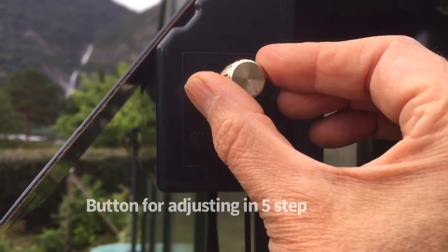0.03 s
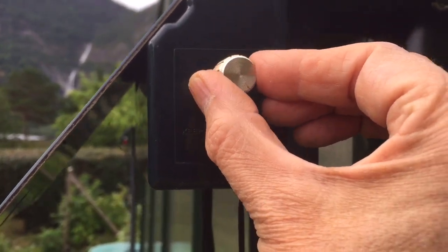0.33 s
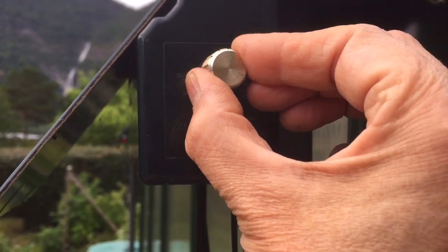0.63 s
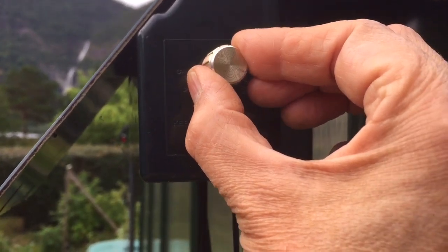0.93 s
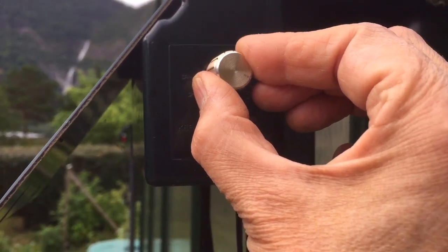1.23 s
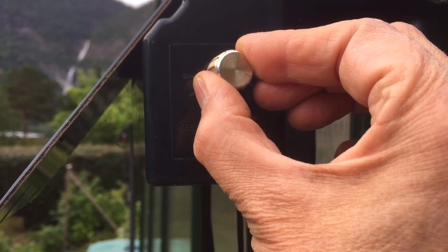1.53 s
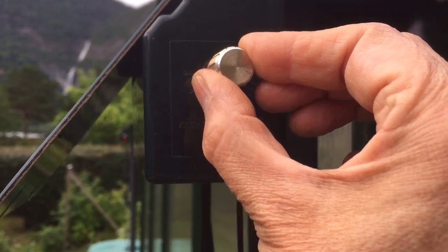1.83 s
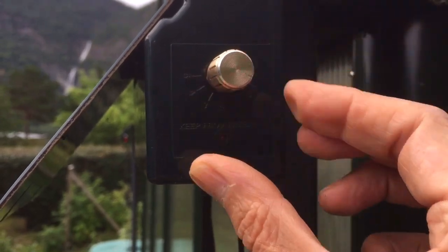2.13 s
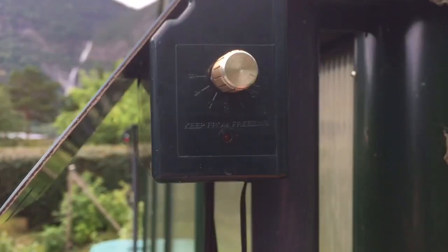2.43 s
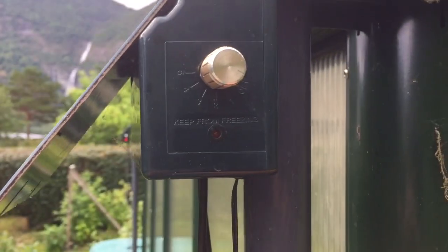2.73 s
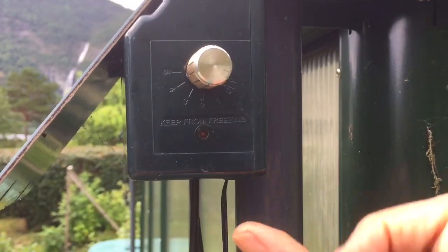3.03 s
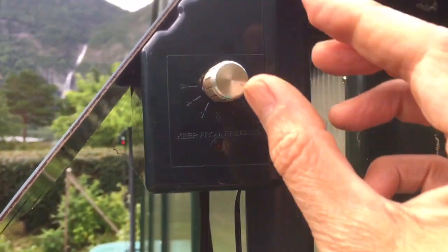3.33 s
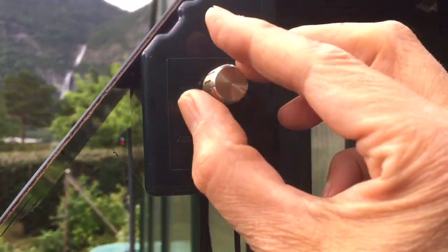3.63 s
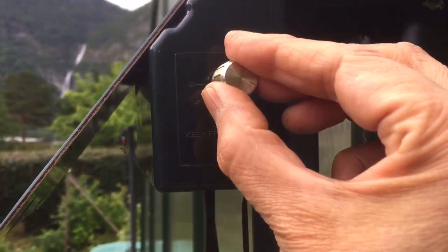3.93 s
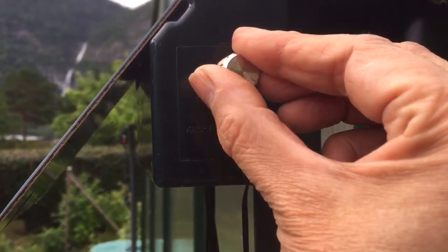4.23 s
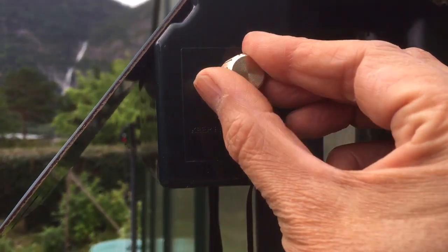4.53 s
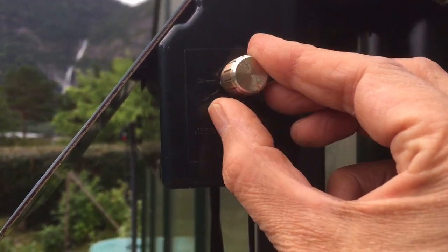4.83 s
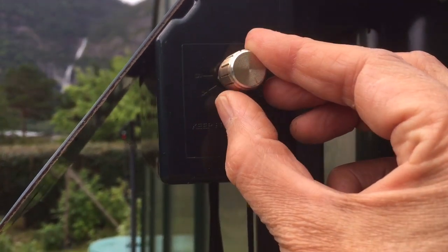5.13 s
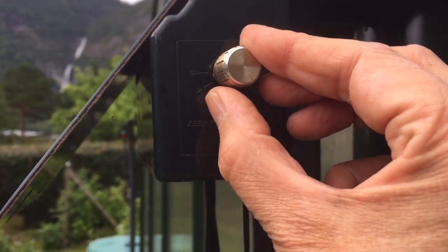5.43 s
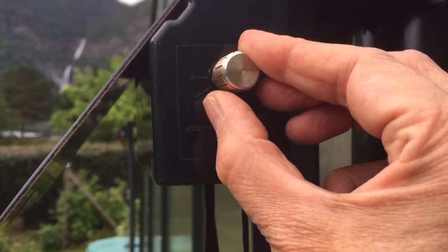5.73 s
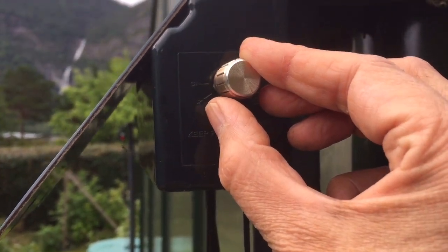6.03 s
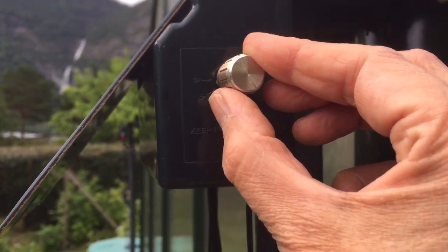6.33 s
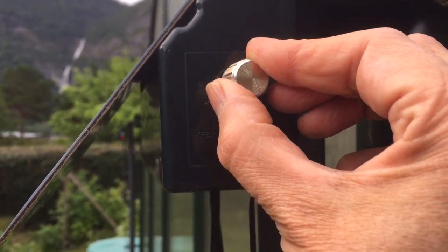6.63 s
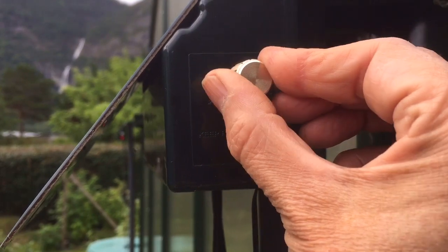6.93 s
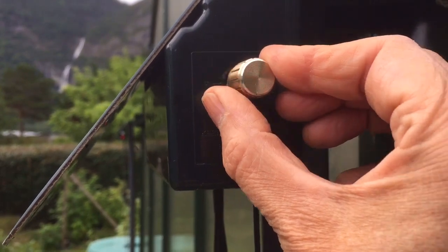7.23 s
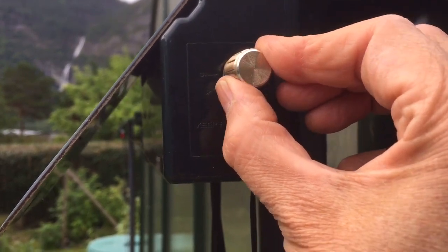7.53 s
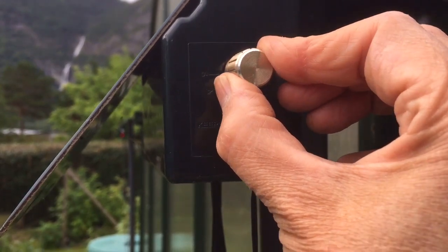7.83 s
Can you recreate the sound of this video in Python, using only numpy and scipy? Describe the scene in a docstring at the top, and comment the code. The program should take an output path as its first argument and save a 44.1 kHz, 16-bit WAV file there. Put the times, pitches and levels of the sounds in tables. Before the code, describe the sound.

Loud rattling buzz of a small water pump cuts out and starts again as a knob clicks, over a quieter motor hum.

```python
"""Beside a greenhouse, a small irrigation pump buzzes, is throttled, stops and later restarts.
Its piston knocks twice a turn and rings the pump body while water hisses through the valves.
Close by, a hand turns the stepped control knob and its detents snap. Behind it a second small
motor hums on, a bird calls far off, a faint high chirring swells and fades in the garden air,
and light wind nudges the microphone."""
import sys
import numpy as np
from scipy import signal
from scipy.fft import rfft, irfft, next_fast_len
from scipy.io import wavfile
from scipy.ndimage import uniform_filter1d

SR = 44100
rng = np.random.default_rng(int(sys.argv[2]) if len(sys.argv) > 2 else 0)


def to_wav(s):
    """Save 16-bit WAV."""
    ch = np.atleast_2d(s).T  # columns
    pcm = np.round(np.clip(ch, -1, 1) * 32767)  # PCM
    wavfile.write(sys.argv[1], SR, pcm.astype(np.int16))


N = 351918
TIME = np.arange(N) / SR
SIZE = next_fast_len(N + SR // 4, True)
FREQ = np.maximum(np.arange(SIZE // 2 + 1) * SR / SIZE, 1)

# parts that clack when the pressure stroke lands hard: pitch_hz, width_hz
CLACK_MODES = [(2350, 410), (4650, 220), (6900, 100)]
CHAMBER_HZ, CHAMBER_WIDTH_HZ = 1018, 120  # ring of the water chamber
STRAIN_HZ = 0.88  # lost speed at which the strain starts to level off


def undb(db):
    """Decibels to gain."""
    return 10 ** (np.asarray(db) / 20)


def shape(x, response):
    """Pass a sound through a frequency response."""
    return irfft(rfft(x, SIZE) * response, SIZE)[:N]


def noise(points):
    """Noise of rms 1, coloured by (freq_hz, level_db) points."""
    hz, db = np.transpose(points)
    coloured = shape(rng.standard_normal(N), undb(np.interp(np.log(FREQ), np.log(hz), db)))
    return coloured / np.sqrt(np.mean(coloured ** 2))


def walk(rate_hz):
    """Smooth random drift with a spread near 1."""
    hold = int(SR / rate_hz)
    steps = np.repeat(rng.standard_normal(N // hold + 1), hold)
    return 1.3 * uniform_filter1d(uniform_filter1d(steps, hold), hold)[:N]


def bell(hz, width_hz):
    """Gain of one resonance, halved at width_hz either side."""
    return 1 / (1 + ((FREQ - hz) / width_hz) ** 2)


def resonator(modes, travel_ms):
    """Response of a ringing body; bending waves take travel_ms at 1 kHz and bring the treble first."""
    power = sum((undb(db) * bell(hz, width)) ** 2 for hz, width, db in modes)
    cepstrum = irfft(np.log(power), SIZE)
    cepstrum[0] /= 2
    cepstrum[SIZE // 2:] = 0  # the ring follows the blow
    return np.exp(rfft(cepstrum) - 4j * np.pi * travel_ms * np.sqrt(FREQ / 1000))


def impulses(times, sizes):
    """Sharp blows placed between the samples."""
    out = np.zeros(N)
    at = np.asarray(times)[:, None] * SR
    index = at.astype(int) + np.arange(-5, 7)
    taps = np.sinc(index - at) * np.sinc((index - at) / 6)
    np.add.at(out, np.clip(index, 0, N - 1), taps * np.asarray(sizes)[:, None])
    return out


def scrape(times, sizes, decay_s):
    """A dying burst of noise at each blow, with the energy of that blow."""
    index = np.clip(np.asarray(times) * SR, 0, N - 1).astype(int)
    energy = np.bincount(index, np.asarray(sizes) ** 2, N)
    keep = np.exp(-2 / (decay_s * SR))
    return np.sqrt(signal.lfilter([1 - keep], [1, -keep], energy + 1e-18)) * rng.standard_normal(N)


def knocks(times, sizes, jitter_ms, scatter_db, grit_db, grit_hz, grit_s):
    """Slightly uneven blows; each rubs a little, so its treble is never quite the same twice."""
    chance = rng.standard_normal((len(times), 2))
    times = times + chance[:, 0] * jitter_ms / 1000
    sizes = sizes * undb(scatter_db * chance[:, 1])
    rough = undb(grit_db) + (FREQ / grit_hz) ** 2
    clean = shape(impulses(times, sizes), 1 / np.hypot(1, rough))
    return clean + shape(scrape(times, sizes, grit_s), rough / np.hypot(1, rough))


def hum(turns, harmonics):
    """Clean multiples of a shaft's turn rate."""
    return sum(np.sqrt(2) * undb(db) * np.cos(2 * np.pi * k * turns) for k, db in harmonics)


def boost(x, band, db):
    """The layer that, added to x, lifts or cuts one band by db."""
    return (undb(db) - 1) * shape(x, band)


def ramp(start_s, length_s):
    """A straight rise from 0 to 1."""
    return np.clip((TIME - start_s) / length_s, 0, 1)


def swell(start_s, rise_s, hold_s, fall_s):
    """Attack, hold and release."""
    return ramp(start_s, rise_s) * (1 - ramp(start_s + rise_s + hold_s, fall_s))


def valve_flap(lead_s=0.001118):
    """Response of the flap: it ticks just ahead of the piston and takes a share of the treble."""
    share = undb(-9) * FREQ ** 2 / (FREQ ** 2 + 3500 ** 2)
    return np.sqrt(1 - share ** 2) + share * np.exp(2j * np.pi * FREQ * lead_s)


def valve_hiss(stroke_turns):
    """Water hisses through the valves, surging as the piston ends its pressure stroke."""
    # colour of the flow: freq_hz, level_db
    flow_spectrum = [(300, -7.5), (900, 6), (2500, 6.5), (4200, -3), (5200, -0.5), (6200, -2), (7300, -3),
                     (8200, -8), (9500, -7), (10500, -17), (12600, -22), (15500, -36)]
    from_stroke = (stroke_turns + .5) % 1 - .5
    surge = np.exp(-(from_stroke / 0.1) ** 2)
    return noise(flow_spectrum) * (undb(-50) + undb(-50.5) * surge)


def pump(run, load, pressure_body, return_body):
    """Two piston knocks a turn ring the body; strain weakens them and brings out the chamber."""
    # the pump shaking on its mount: harmonic, level_db
    mount_hum = [(2, -51.5), (3, -67), (4, -59.5), (5, -59), (6, -67.5)]
    free_hz, stop_db_per_s = 49.84, 1300
    on_s, off_s, run_db, stroke_phase, clack_db, chamber_db, casing_db = run
    lost_hz, extra_db, extra_clack_db = load
    strain = np.tanh(np.maximum(lost_hz, 0) / STRAIN_HZ)
    level_db = run_db + extra_db - 2 * strain - stop_db_per_s * np.maximum(TIME - off_s, 0)
    running = (TIME >= on_s) & (level_db > -60)
    turns = np.cumsum((free_hz - lost_hz) * running) / SR
    stroke_turns = turns - stroke_phase - 0.0037 * walk(5)
    strokes = []
    for phase in (stroke_turns, turns):
        times = np.interp(np.arange(np.ceil(phase[running][-1])), phase[running], TIME[running])
        sizes = undb(np.interp(times, TIME, level_db))
        strokes.append(knocks(times, sizes, jitter_ms=.011, scatter_db=.3,
                              grit_db=-27, grit_hz=14500, grit_s=.002))
    pressure = shape(strokes[0], pressure_body * valve_flap())
    clack = boost(pressure, sum(bell(*mode) for mode in CLACK_MODES), clack_db + extra_clack_db)
    knocking = pressure + clack + shape(strokes[1], return_body)
    chamber = boost(knocking, bell(CHAMBER_HZ, CHAMBER_WIDTH_HZ), chamber_db + 5.5 * strain)
    # the nasal casing ring recedes as the clack hardens; a treble band glares above the free speed
    casing = boost(knocking, bell(1780, 45.8), casing_db - 0.7 * np.maximum(extra_clack_db, 0))
    glare = boost(knocking, bell(5760, 250), 1.5 * np.maximum(-lost_hz, 0))
    effort = uniform_filter1d(running * undb(level_db), size=400)
    drone = effort * (valve_hiss(stroke_turns) + hum(turns, mount_hum))
    return knocking + chamber + casing + glare + drone


def motor(turn_hz=67.97):
    """A second motor hums throughout; its shell rattles hard once a turn and softer in between."""
    # shaft hum: harmonic, level_db
    shaft_hum = [(1, -57), (2, -61.5), (3, -54.5), (4, -64), (6, -74)]
    # ring of the shell: pitch_hz, width_hz, level_db
    shell_modes = [(1373, 75, -18), (1552, 79, -10), (1740, 70, -16), (1854, 110, -22), (1960, 50, -21),
                   (2302, 87, -16), (2338, 170, -23.5), (2740, 49, -23.5), (2920, 50, -32), (3260, 36, -34),
                   (3465, 120, -29.5), (3680, 220, -34), (5140, 1000, -42), (7580, 1200, -49.5)]
    turns = np.cumsum(turn_hz * (1 + 0.001183 * walk(9))) / SR
    whole_turns = np.arange(int(turns[-1]))
    rattle = 0
    for phase, db in [(0, 0.72), (.37, -2)]:
        times = np.interp(whole_turns + phase, turns, TIME)
        rattle += knocks(times, np.full(len(times), undb(db)), jitter_ms=.02, scatter_db=.8,
                         grit_db=-15, grit_hz=3600, grit_s=.004)
    shell = shape(rattle, resonator(shell_modes, travel_ms=1.821))
    return hum(turns, shaft_hum) * undb(0.28 * walk(5)) + shell


def garden_air():
    """A soft bed of open air whose level drifts."""
    # colour of the air: freq_hz, level_db
    air_spectrum = [(22, -50), (35, -6), (55, 6), (90, 3.5), (170, -2), (330, -3), (700, -5.5),
                    (1100, -8.5), (2200, -7.5), (3000, -24.5), (6000, -33.5), (9500, -38), (10500, -44.5),
                    (11500, -39.5), (15500, -43)]
    return noise(air_spectrum) * undb(-54.5 + walk(2.49))


def wind():
    """A light breeze flutters on the microphone, and stronger puffs thud against it."""
    # puffs: crest_s, rise_s, fall_s, relative_db
    gusts = [(3.93, .04, 0.053, -38), (4.36, .025, 0.026, -40), (4.53, 0.023, 0.034, -35),
             (4.64, 0.022, 0.041, -39.5), (4.748, 0.024, 0.035, -31), (6.999, 0.036, 0.083, -31),
             (7.69, .03, 0.081, -46)]
    # colour of the rumble: freq_hz, level_db
    rumble_spectrum = [(22, -44), (38, -10), (55, 2.5), (80, -4.5), (130, -11.5), (220, -21.5),
                       (400, -33.5), (900, -73.5)]
    puffs = sum(undb(db) * np.exp(-np.maximum((crest_s - TIME) / rise_s, (TIME - crest_s) / fall_s))
                for crest_s, rise_s, fall_s, db in gusts)
    breeze = undb(-62.5 + 2.5 * walk(4))
    eddies = noise(rumble_spectrum)
    eddies /= np.sqrt(uniform_filter1d(eddies ** 2, size=2600))  # puffs and breeze alone set the level
    return undb(-1.5) * np.hypot(puffs, breeze) * eddies


def knob():
    """The detent spring slips, seats a few ms later and rebounds; the greenhouse wall adds a tail."""
    # detent snaps: start_s, level_db, tilt_db_per_octave
    snaps = [(0.6565, 10, 2), (0.659, 15, 8), (4.1025, -8.5, -1), (4.3737, 8, -0.5), (4.3752, -1, -3),
             (4.3773, 10.5, 5), (6.8717, 5.5, -4.5), (6.875, 5.5, 12)]
    # ring of the knob and control box: pitch_hz, width_hz, level_db
    box_modes = [(1835, 240, -7), (2450, 92, -4), (3360, 510, -11), (3920, 120, -10), (4360, 610, -11.5),
                 (5840, 220, -10.5), (6830, 160, -7.5), (7780, 250, -11), (8570, 220, -14.5),
                 (9020, 350, -15.5), (9940, 280, -14.5), (11100, 440, -18.5), (13120, 400, -23),
                 (14950, 574, -34)]
    octaves = np.log2(np.clip(FREQ, 1500, 11000) / 6000)
    spectrum = 0
    for start_s, db, tilt_db in snaps:
        click = impulses([start_s, start_s + 0.00095], undb([-2, -5]))
        grit = undb(-11) * scrape([start_s], [1], decay_s=.002)
        tail = undb(-21.5) * scrape([start_s], [1], decay_s=.022)
        spectrum += rfft(click + grit + tail, SIZE) * undb(db + tilt_db * octaves)
    return irfft(spectrum * resonator(box_modes, travel_ms=1.1), SIZE)[:N]


def throttle_load(start_s=1.379, step_hz=1.23, sink_hz_per_s=3.73):
    """Throttled, the pump drops a step in speed, keeps sinking and clacks harder."""
    lost_hz = ramp(start_s, .04) * (step_hz + sink_hz_per_s * (TIME - start_s))
    extra_clack_db = 5.5 * np.tanh(lost_hz / STRAIN_HZ)
    return lost_hz, 0, extra_clack_db


def last_knock(body, start_s=1.757):
    """The stopped piston falls back with one light clack; the slack chamber hardly rings."""
    slack = 1 - bell(CHAMBER_HZ, 2 * CHAMBER_WIDTH_HZ)
    clack = 1 + sum(bell(*mode) for mode in CLACK_MODES)
    return shape(impulses([start_s], undb([-14])), body * slack * clack)


def bird(fall_hz_per_s=14000):
    """A distant call of two falling notes, smeared by the hillside."""
    # calls: start_s, relative_db
    calls = [(1.88, -71), (2.84, -65), (4.878, -68)]
    # notes of one call: delay_s, length_s, start_hz, relative_db
    notes = [(0, 0.051, 4570, -5), (.04, 0.057, 3510, 1.5)]
    song = 0
    for delay_s, length_s, start_hz, note_db in notes:
        waver = 1 + .032 * walk(600)
        for start_s, call_db in calls:
            progress = ramp(start_s + delay_s, length_s)
            pitch_hz = (start_hz - fall_hz_per_s * length_s * progress) * waver
            envelope = undb(call_db + note_db) * np.sin(np.pi * progress)
            song += envelope * np.sin(2 * np.pi * np.cumsum(pitch_hz) / SR)
    hillside = rfft(scrape([0], [1], decay_s=.039), SIZE)
    return undb(-2) * song + undb(8) * shape(song, hillside)


def chirring():
    """A faint high chirring from the garden swells, flickers and fades."""
    # its narrow treble band: freq_hz, level_db
    chirr_spectrum = [(3500, -45), (4500, -2), (5100, -7.5), (6500, -31), (8000, -50)]
    envelope = swell(start_s=2.2, rise_s=.2, hold_s=.9, fall_s=.2)
    return noise(chirr_spectrum) * envelope * undb(-81 + 2.1 * walk(60))


def restart_load(on_s, primed_s=6.145):
    """The pump spins up and clacks hard until primed, then races briefly as the clack drops away."""
    age_s = np.maximum(TIME - on_s, 0)
    race = swell(primed_s, rise_s=.04, hold_s=.07, fall_s=.15)
    unprimed = 1 - ramp(primed_s, .04)
    spin_up_hz = 12.94 * np.exp(-age_s / .0178)
    water_drag_hz = 5.916 * np.exp(-age_s / .0977)
    pressure_sag_hz = .045 * age_s
    lost_hz = spin_up_hz + water_drag_hz + pressure_sag_hz - 1.09 * race
    # the first stroke barely lands, then the knocks grow
    onset_db = -24 * np.exp(-age_s / .0081) - 4 * np.exp(-age_s / .15)
    extra_db = onset_db + 0.14 * unprimed + 1.5 * race
    extra_clack_db = 3 * unprimed - 6 * race
    return lost_hz, extra_db, extra_clack_db


def scene():
    """Two pump runs, the knob and the garden behind them, in mono."""
    # ring of the pump body on each stroke: pitch_hz, width_hz, pressure_db, return_db
    body_modes = [(563, 87, -9, -12), (708, 34, 0, -4.5), (921, 83, -3, 5), (1031, 78, 9, 6),
                  (1037, 65, 5.5, -20.5), (1250, 81, 0, -3.5), (1372, 82, -0.5, -7), (1834, 24, 2, -7),
                  (1804, 37, 7, 6), (2010, 69, 5, -22.5), (2287, 130, 5, -5), (2466, 36, 1.5, -3),
                  (2707, 89, -1.5, -6.5), (2940, 82, -6, -5), (3120, 110, -6, -16), (3388, 19, -2.5, -0.5),
                  (3660, 131, -4, 1), (3986, 92, -0.5, 2.5), (4366, 156, -4.5, -3.5), (4775, 180, -1, -11),
                  (5740, 134, -1.5, -3), (5934, 154, -1, -1), (6240, 450, -4.5, -8.5),
                  (6730, 210, -7, -12.5), (8080, 430, -12.5, -19), (8880, 240, -24, -15.5),
                  (9400, 230, -15, -29), (10400, 580, -31, -30), (12500, 459, -32.5, -38),
                  (13834, 950, -40.5, -43.5)]
    # pump runs: on_s, off_s, level_db, pressure_phase_turns, clack_db, chamber_db, casing_db
    runs = [(.0047, 1.724, 0.55, .473, -4.5, -4.5, 0.5), (5.4913, 8.1, -0.32, .468, -0.6, -3.5, -6)]
    pressure_body = resonator([(hz, width, db) for hz, width, db, _ in body_modes], travel_ms=2.005)
    return_body = resonator([(hz, width, db) for hz, width, _, db in body_modes], travel_ms=1.788)
    first_run = pump(runs[0], throttle_load(), pressure_body, return_body)
    second_run = pump(runs[1], restart_load(on_s=runs[1][0]), pressure_body, return_body)
    machines = first_run + last_knock(pressure_body) + second_run + motor() + knob()
    return (machines + bird() + wind() + chirring() + garden_air())[None]


def record(dry):
    """A steep low-pass cuts the very top."""
    top_hz = 15850
    return signal.sosfilt(signal.ellip(10, .1, 80, top_hz, fs=SR, output="sos"), dry)


dry = scene()
out = record(dry)
to_wav(out)
```